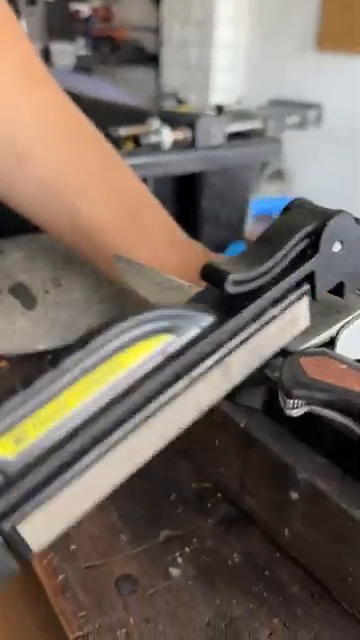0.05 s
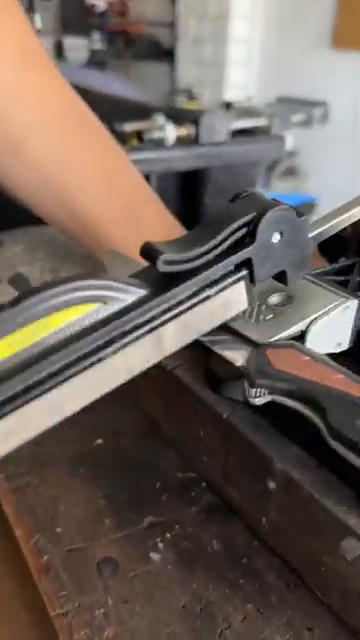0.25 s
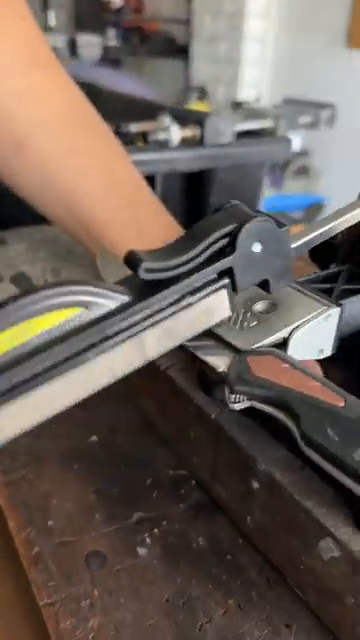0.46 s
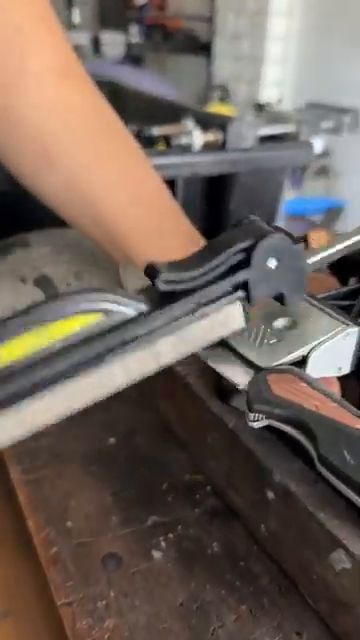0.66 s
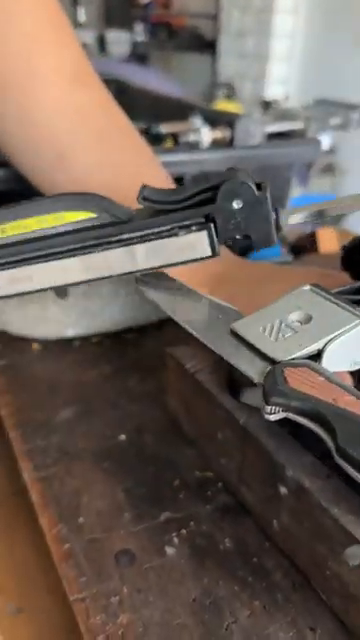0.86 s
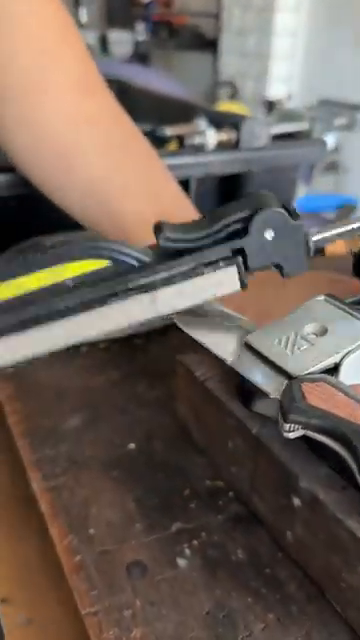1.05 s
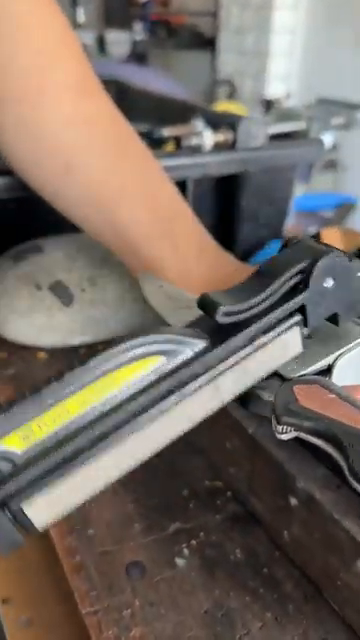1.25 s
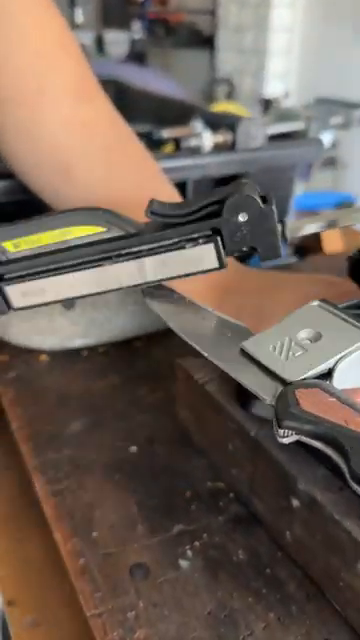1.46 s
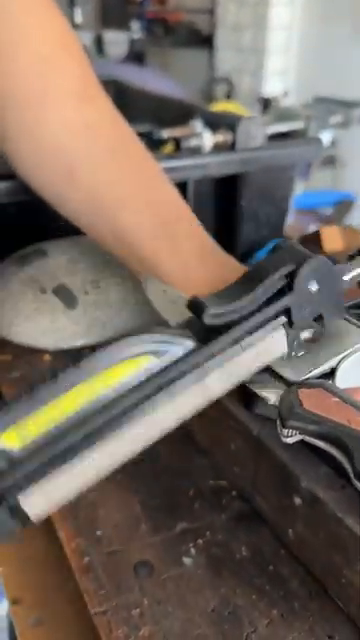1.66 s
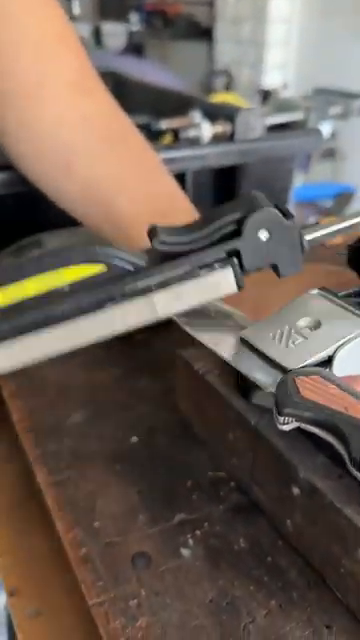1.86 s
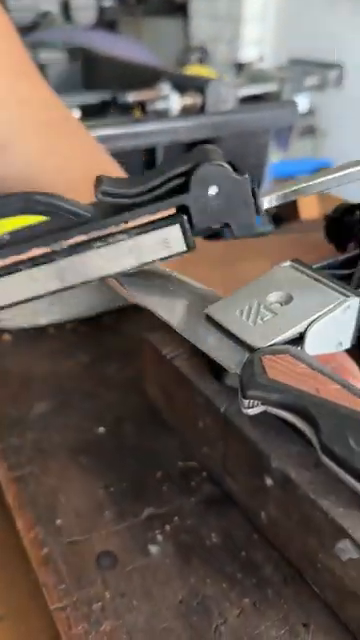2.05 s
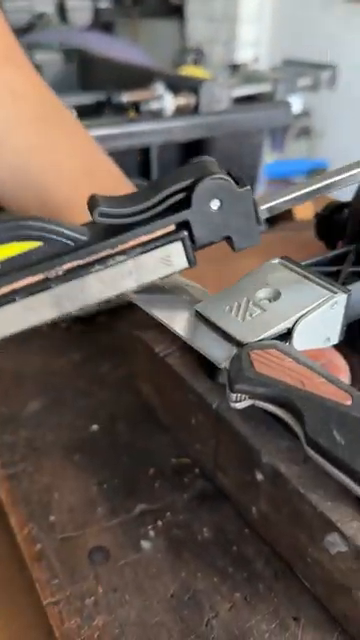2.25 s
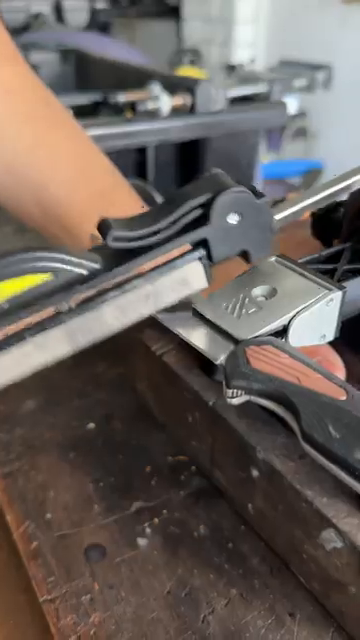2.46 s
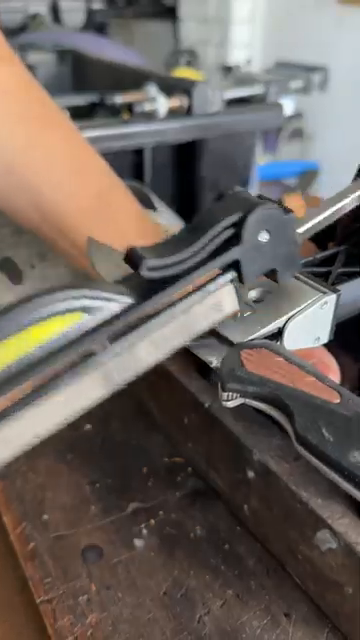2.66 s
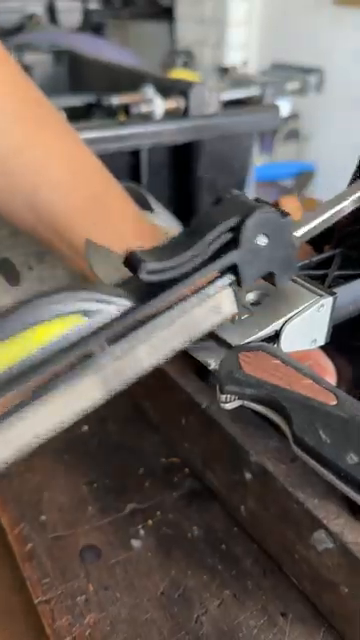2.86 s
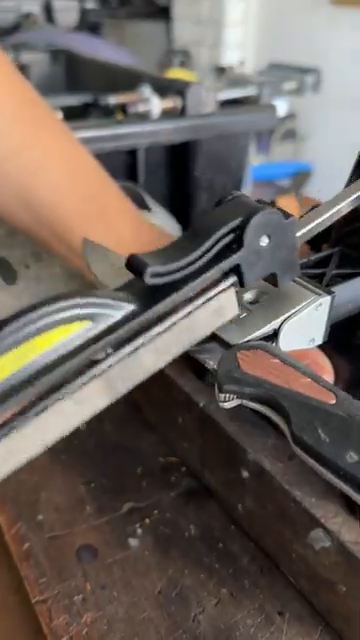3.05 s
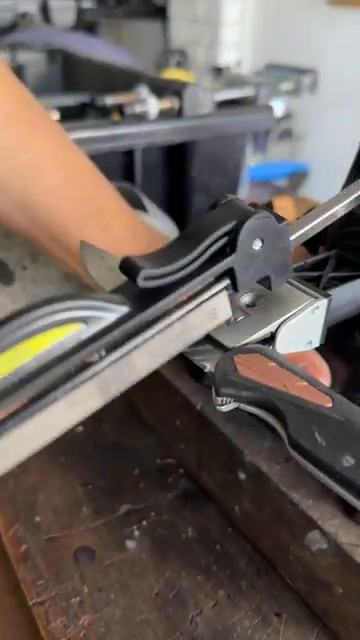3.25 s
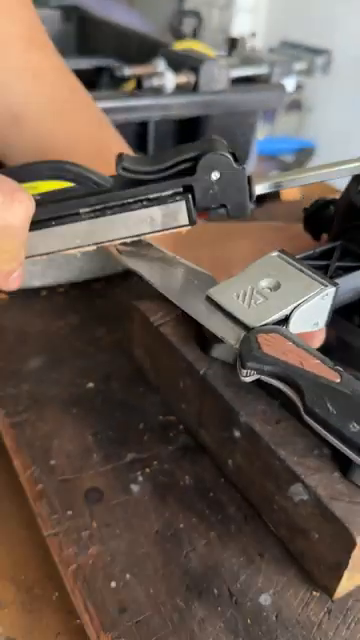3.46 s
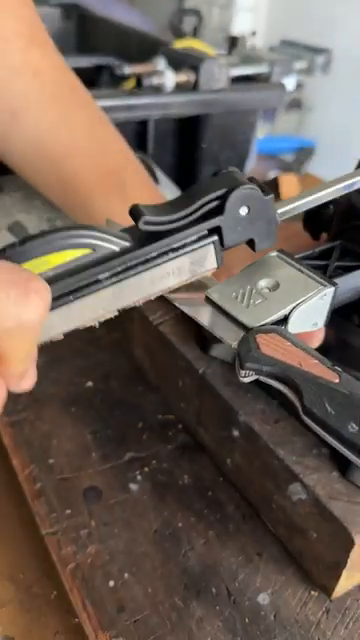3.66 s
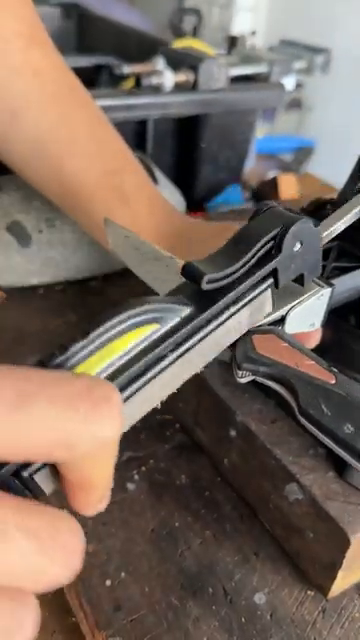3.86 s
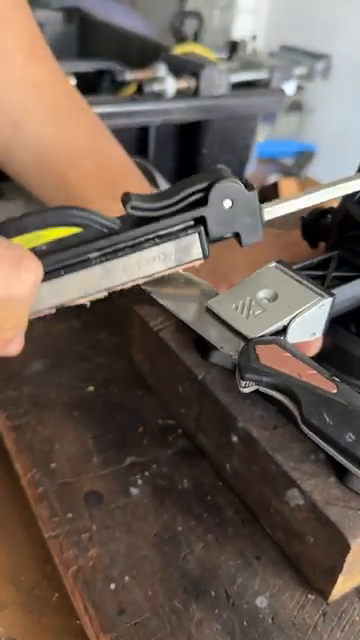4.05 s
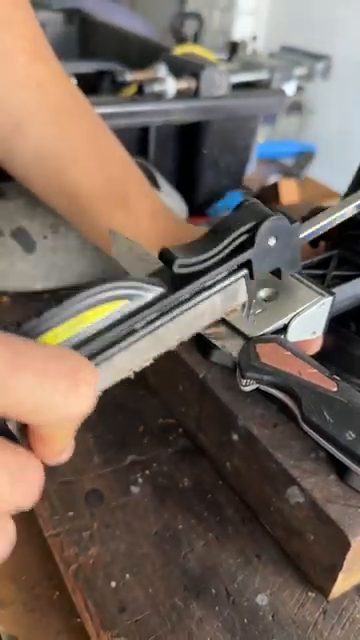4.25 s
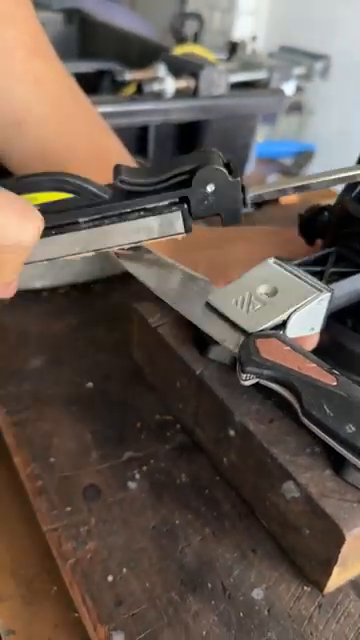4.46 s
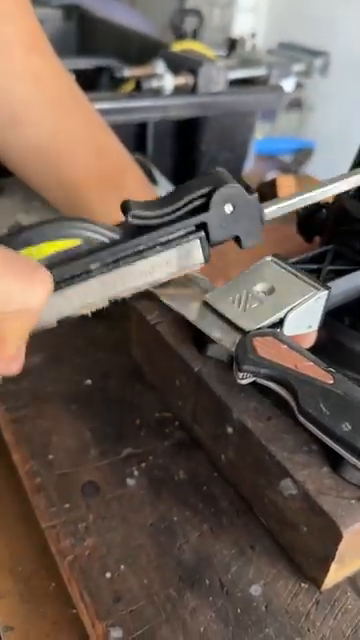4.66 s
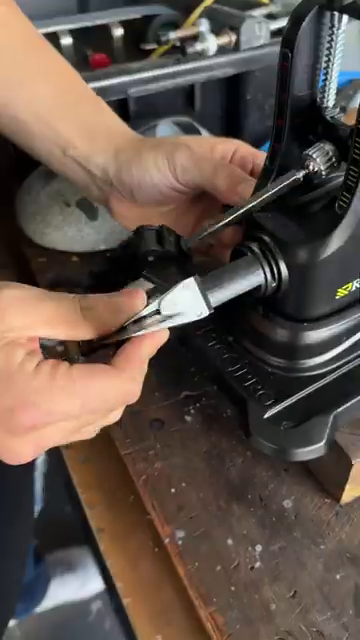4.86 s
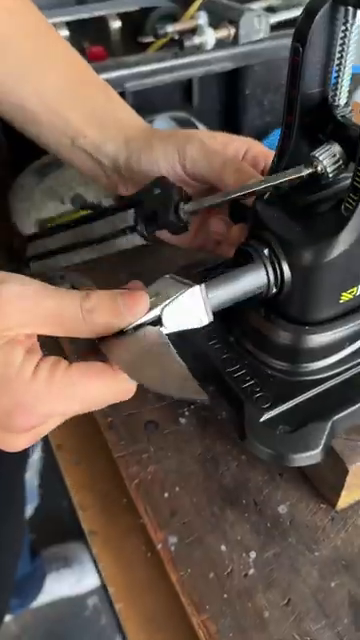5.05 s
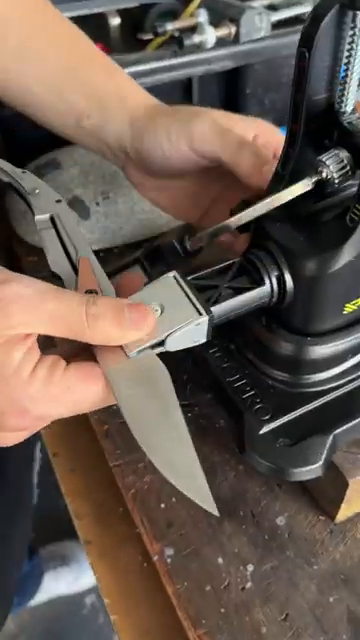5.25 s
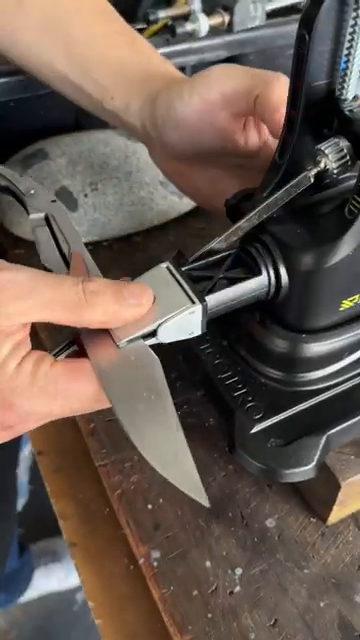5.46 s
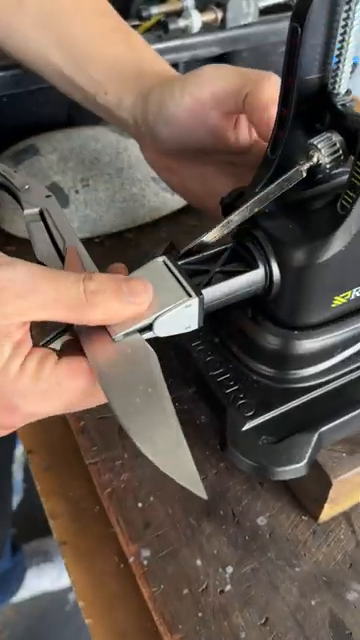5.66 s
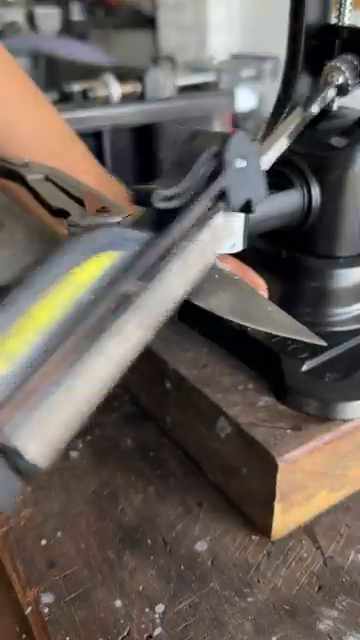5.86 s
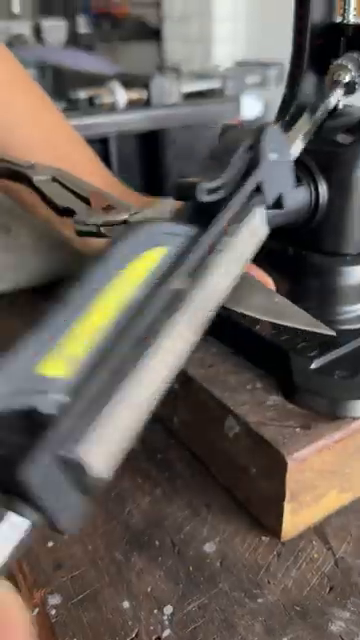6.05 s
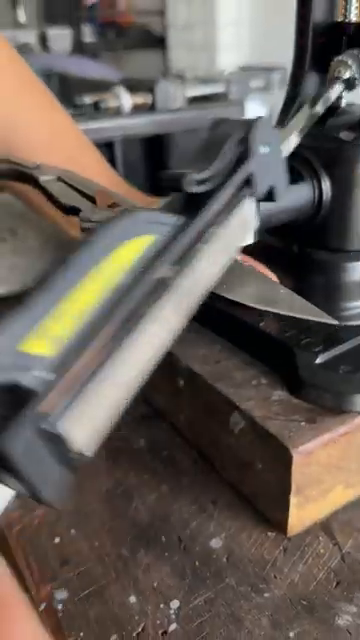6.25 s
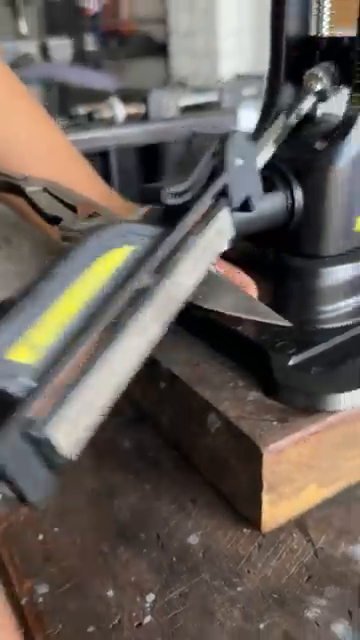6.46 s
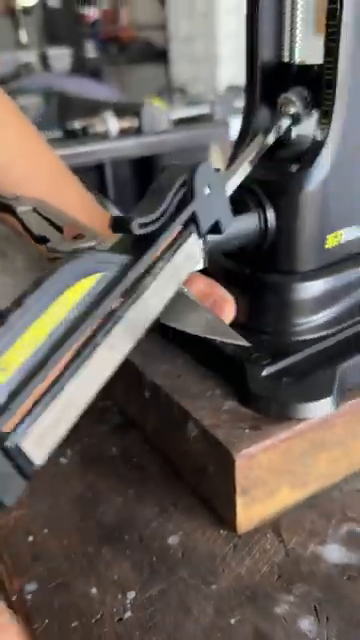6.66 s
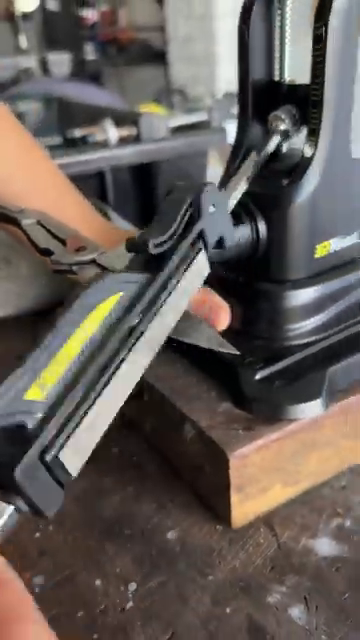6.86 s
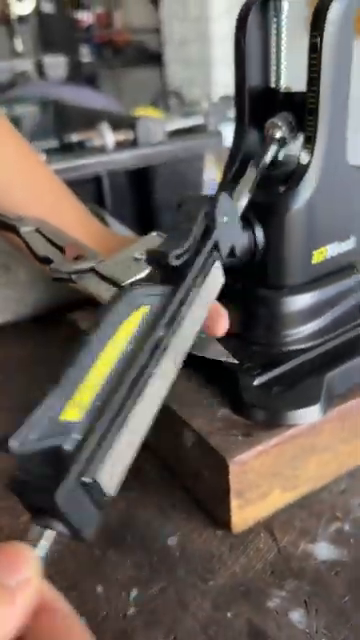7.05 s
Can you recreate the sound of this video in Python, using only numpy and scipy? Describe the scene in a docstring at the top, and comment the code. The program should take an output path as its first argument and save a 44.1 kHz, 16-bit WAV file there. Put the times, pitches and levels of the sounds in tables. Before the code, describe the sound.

Gritty steel honing strokes with dull rod knocks, a brief low hum, loud metal clamp clacks with a ringing blade, then more quick scraping.

```python
"""Workshop bench: a stone on a guide rod scrapes to and fro over a clamped knife, four to nine strokes a second.
Honing is grains of noise through steel resonances, gated by stroke speed; rod knocks are struck modes plus cracks.
Honing pauses while a motor hums (sines); the clamp is turned over with rubbing, groans and loud clacks (modes
and noise) and the blade rings (decaying modes); then the other face is honed.
Room hiss and rumble run beneath; the level dips sharply for about 20 ms six times."""
import sys
import numpy as np
from scipy import signal
from scipy.fft import rfft, irfft, next_fast_len
from scipy.io import wavfile
from scipy.ndimage import uniform_filter1d

SR = 44100
rng = np.random.default_rng(int(sys.argv[2]) if len(sys.argv) > 2 else 0)


def materialize(psi):
    """Save the field psi as 16-bit PCM at rate SR to the path in sys.argv[1].

    A 1-D psi becomes a single channel; in a 2-D psi each row is a channel.
    """
    bounded = np.clip(np.atleast_2d(psi).T, -1, 1)
    quanta = np.round(bounded * 32767).astype(np.int16)
    wavfile.write(sys.argv[1], SR, quanta)


N = 313551
TIME = np.arange(N) / SR
HZ = np.maximum(np.arange(N // 2 + 1) * SR / N, 1)


def from_db(db):
    """Decibels to gain."""
    return 10 ** (np.asarray(db) / 20)


def in_time(rows):
    """Interpolate each column of a curve at every sample."""
    s, *columns = np.transpose(rows)
    return [np.interp(TIME, s, column) for column in columns]


def colour(points):
    """Gain at every frequency from a short spectrum, interpolated over log frequency."""
    hz, db = np.transpose(points)
    return from_db(np.interp(np.log(HZ), np.log(hz), db))


def filtered(x, gain):
    """Apply a gain, real or complex, at every frequency."""
    size = next_fast_len(N + 4096)
    grid_hz = np.arange(size // 2 + 1) * SR / size
    spectrum = rfft(x, size) * np.interp(grid_hz, HZ, gain)
    return irfft(spectrum, size)[..., :N]


def rms_one(x):
    """Scale to rms 1."""
    return x / np.sqrt(np.mean(x ** 2) + 1e-20)


def peak_one(x):
    """Scale so that the loudest 4 ms have rms 1."""
    return x / np.sqrt(uniform_filter1d(x ** 2, SR // 250).max() + 1e-20)


def drift(axis_values, step):
    """Random curve along time or frequency: unit-spread Gaussian knots joined by lines."""
    knots = rng.standard_normal(4096)
    return np.interp(axis_values / step, np.arange(len(knots)), knots)


def ring(push, modes):
    """Decaying modes driven by a force; neighbouring modes swing in opposite senses."""
    out = 0
    for hz, db, t60_s in modes:
        radius = from_db(-60 / (t60_s * SR))
        angle = 2 * np.pi * hz / SR
        poles = [1, -2 * radius * np.cos(angle), radius * radius]
        mode = signal.lfilter([0, np.sin(angle)], poles, push + 1e-18)
        out = -out + from_db(db) * mode
    return out


def add(track, s, sound):
    """Mix a short sound in at a time, trimmed to the track."""
    at = round(s * SR)
    sound = sound[max(-at, 0):N - at]
    track[max(at, 0):max(at, 0) + len(sound)] += sound


def grains(per_s, spread_db):
    """Random tiny fractures of uneven size and either sign."""
    sizes = from_db(spread_db * np.minimum(rng.exponential(1, N), 4))
    signed = sizes * rng.choice([-1, 1], N)
    return rms_one(signed * (rng.random(N) < per_s / SR))


def crack(force, bright_db, body):
    """Hard contact noise: coloured by the body, tilted about 4 kHz by hardness; loudest 4 ms at rms 1."""
    hz = np.maximum(np.abs(np.fft.fftfreq(len(force))) * SR, 1)
    tilt = from_db(bright_db * np.clip(np.log2(hz / 4000) / 2, -.5, .8))
    log_gain = np.log(np.interp(hz, HZ, body) * tilt)
    causal = np.exp(np.conj(signal.hilbert(log_gain)))   # minimum phase: rings only after contact
    return peak_one(irfft(rfft(force) * causal[:len(force) // 2 + 1], len(force)))


def sliding(per_s, response, spread_db, shift_db, count=5):
    """Grains under a moving contact: random crossfades between differently rippled narrow modes."""
    total, power = 0, 0
    for layer in range(count):
        share = from_db(10 * drift(TIME, .045))
        modes = response * from_db(shift_db * drift(HZ, 70.02))
        total = total + share * rms_one(filtered(grains(per_s, spread_db), modes))
        power = power + share ** 2
    return total / np.sqrt(power)


# Stone, holder and blade resonances. Each row: centre in Hz, width in Hz, lift in dB.
STEEL_RESONANCES = [(578, 130, 7), (830, 150, 3.5), (1000, 140, 3.5), (1654, 120, 3.5), (2676, 160, 6),
                    (3806, 310, 7.5), (5600, 160, 2.5), (6630, 230, 3.5), (7060, 140, 2), (8070, 390, 4.5),
                    (9780, 640, 7), (13000, 230, -6), (15200, 450, 2)]


def steel(ripple_db):
    """Response of the assembly: broad resonances over a thicket of narrow ones."""
    lift_db = sum(db / (1 + (2 * (HZ - hz) / width) ** 2) for hz, width, db in STEEL_RESONANCES)
    return from_db(lift_db + ripple_db * drift(HZ, 45))


# Stereo width. Each row: frequency in Hz, side over mid in dB before scaling.
STEREO_WIDTH = [(60, -34), (150, -22), (300, -11.5), (700, -7.5), (1300, -7), (2400, -4.5), (4400, -3),
                (8000, -2.5), (11000, 4.5), (15000, -5.5)]


def two_ports(x, scatter=3.3, side_db=0.5, imbalance=0.35):
    """Near reflections give two microphones different phase and level at each pitch, more so in the treble."""
    lead = np.tanh(scatter * drift(HZ, 219.8) - (HZ / 7500) ** 2)
    louder = imbalance * (drift(HZ, 296) + 0.36 * np.clip(HZ / 15000, 0, 1))
    side = from_db(side_db) * filtered(x, colour(STEREO_WIDTH) * (louder + 1j * lead))
    return np.array([x + side, x - side])


# Stone strokes. Each row: start in seconds, length in seconds, grit level in relative dB,
# holder level in relative dB, growth from start to end in dB.
STONE_STROKES = [(-0.08, 0.23, -55, -55, -4), (0.167, .127, -54.5, -55, 1), (0.296, 0.1, -52, -52.5, 1),
                 (0.427, 0.12, -51, -52, 2.5), (0.548, 0.14, -52.5, -54.5, -4), (0.669, 0.1, -39, -47.5, 2),
                 (0.73, .248, -53.5, -51.5, 1), (0.987, 0.27, -52.5, -54, 2), (1.267, 0.24, -49.5, -51, 2),
                 (1.532, 0.25, -52.5, -52, 1.5), (1.784, .26, -50.5, -52, 1.5),
                 (1.993, .122, -41, -46.5, 2), (2.1, .122, -47, -48, -7), (2.221, .11, -42.5, -49.5, 4),
                 (2.333, 0.12, -48.5, -50, -11), (2.45, .1, -44.5, -51.5, 6), (2.547, 0.11, -47.5, -52, -2),
                 (2.651, 0.12, -49.5, -54.5, -4), (2.763, 0.1, -48.5, -50.5, -3),
                 (2.865, 0.12, -48.5, -54, 0), (2.974, 0.12, -49.5, -51, -11),
                 (3.084, 0.12, -47.5, -54.5, 0), (3.192, .103, -46, -49, 2), (3.301, .108, -44.5, -48, -1),
                 (3.402, 0.079, -43.5, -48.5, -7), (5.868, .072, -42, -52.5, 5),
                 (5.938, 0.12, -45, -53, -6), (6.045, 0.11, -45, -59, -3), (6.139, 0.15, -48, -51.5, -7),
                 (6.27, 0.087, -42, -47.5, -1), (6.36, 0.11, -47.5, -48.5, -7),
                 (6.476, 0.099, -44, -50.5, -3), (6.58, 0.12, -49.5, -50, -3.5),
                 (6.693, 0.12, -49.5, -50.5, -7.5), (6.813, 0.1, -50, -49.5, 1), (6.92, 0.11, -51, -51, -6),
                 (7.037, 0.13, -52.5, -51, 0)]
TURN_S = 0.039   # time constant of speeding up and of stopping
GRIT_POWER, HOLDER_POWER = 1.25, 0.86   # exponents of speed
GRIT_REST, HOLDER_REST = 0.12, 0.31   # gain left as the stone turns round


def strokes():
    """Each stroke speeds up, runs and slows to the turn; grit and holder gains follow its speed."""
    grit, holder = np.zeros((2, N))
    for start, length, grit_db, holder_db, growth_db in STONE_STROKES:
        t = TIME[:round(length * SR)]
        speed = np.tanh(t / TURN_S) * np.tanh((length - t) / TURN_S)
        growth = from_db(growth_db * (t / length - .5))
        add(grit, start, from_db(grit_db) * growth * np.hypot(speed ** GRIT_POWER, GRIT_REST))
        add(holder, start, from_db(holder_db) * growth * np.hypot(speed ** HOLDER_POWER, HOLDER_REST))
    return grit, holder


# Hand on the stone. Each row: time in seconds, extra treble in dB, extra bench shake in dB.
HAND_BITE = [(0, -5, -0.5), (.6, 0, 0), (.75, 5, -2), (1.1, 0, -5.5), (1.9, 3.5, -5.5), (2.1, 7, 1),
             (2.4, 2, 0), (3.4, 3, 1), (5.9, -1.5, 0), (6.5, 2.5, -1.5), (7.1, 3.5, -1.5)]
# Grit colour. Each row: frequency in Hz, density in dB per Hz.
GRIT_COLOUR = [(2500, -6), (4500, -12), (6000, -2.5), (7500, 3.5), (8800, -5), (10500, -8), (11800, -15.5),
               (13000, -4.5), (14200, -4), (15700, -4.5)]
# Holder colour. Each row: frequency in Hz, density in dB per Hz.
HOLDER_COLOUR = [(30, 5), (75, 10), (150, 0.5), (330, -11), (600, -0.5), (1200, -14), (2000, -14),
                 (3300, -14.5), (4300, -21.5), (6000, -42)]
PAUSE_FROM_S, PAUSE_TO_S = 3.46, 5.86   # no honing


def honing(body, flutter_db=2.5, hiss_db=0.5, holder_db=0.5, diffuse_db=-3):
    """Grit hiss and holder shake both follow stroke speed, each with its own exponent. Returns left and right."""
    grit_gain, holder_gain = strokes()
    keen_db, shake_db = in_time(HAND_BITE)
    # two independent noise draws; the second widens the stereo image
    grit_response = colour(GRIT_COLOUR) * body
    grit = np.array([sliding(11000, grit_response, spread_db=4.0, shift_db=5.0) for draw in range(2)])
    treble = filtered(grit, 1 / (1 + (9000 / HZ) ** 8))
    grit = grit + treble * (from_db(keen_db) - 1)
    holder_response = colour(HOLDER_COLOUR) * body
    holder = np.array([sliding(4000, holder_response, spread_db=4.0, shift_db=5.5) for draw in range(2)])
    bass = filtered(holder, 1 / (1 + (HZ / 280) ** 4))
    holder = holder + bass * (from_db(shake_db) - 1)
    working = (TIME < PAUSE_FROM_S) | (TIME > PAUSE_TO_S)
    uneven = working * from_db(flutter_db * drift(TIME, .008))
    hiss = from_db(hiss_db) * grit_gain * grit
    shake = from_db(holder_db) * holder_gain * holder
    main, widening = uneven * (hiss + shake)
    side = from_db(diffuse_db) * filtered(widening, colour(STEREO_WIDTH))
    return two_ports(main) + np.array([side, -side])


# Room hiss colour. Each row: frequency in Hz, density in dB per Hz.
AIR_COLOUR = [(150, 8.5), (350, 0.5), (500, -7.5), (700, -2.5), (1000, -8), (1300, -13.5), (2050, -1.5),
              (2800, -15.5), (3800, -16), (5000, -21.5), (9300, -13.5), (11500, -37), (13500, -22),
              (15500, -13.5)]
# Room level. Each row: time in seconds, level in dB before the air and rumble trims.
AIR_LEVEL = [(0, -63.5), (3.45, -58), (4.2, -60.5), (4.7, -56.5), (7.1, -56.5)]
# Rumble colour. Each row: frequency in Hz, density in dB per Hz.
RUMBLE_COLOUR = [(20, -15), (45, -2), (75, 3), (110, -4.5), (160, -2.5), (220, -8.5), (320, -18),
                 (600, -16), (1200, -62)]
# Buzz partials. Each row: multiple of BUZZ_HZ, starting level in relative dB, growth in dB per second.
BUZZ_PARTIALS = [(1, -7, 0), (2, -1, 6), (3, 1, -4), (4, -9, 0), (5, -15, -3)]
MOTOR_HZ, BUZZ_HZ = 59.7, 63.1
HUM_FROM_S, HUM_TO_S = 3.46, 4.86
MOTOR_START_DB, MOTOR_FADE_DB_PER_S, BUZZ_DB = -43, 14.5, -61


def workshop(air_trim_db=-2, waver_db=0.6, rumble_db=-5):
    """A motor's hum fades while a second machine's buzz lingers, over the room's hiss and rumble."""
    air_db, = in_time(AIR_LEVEL)
    running = (TIME > HUM_FROM_S) & (TIME < HUM_TO_S)
    since_s = np.clip(TIME, HUM_FROM_S, HUM_TO_S) - HUM_FROM_S
    turns_s = TIME + .0002 * drift(TIME, .15)   # slightly uneven running
    motor_db = MOTOR_START_DB - MOTOR_FADE_DB_PER_S * since_s
    motor = np.sqrt(2) * np.sin(2 * np.pi * MOTOR_HZ * turns_s)
    buzz = 0
    for multiple, db, growth in BUZZ_PARTIALS:
        cycles = round(multiple) * BUZZ_HZ * turns_s + rng.random()
        buzz = buzz + np.sqrt(2) * from_db(db + growth * since_s) * np.sin(2 * np.pi * cycles)
    waver = from_db(waver_db * drift(TIME, 0.037))
    hum = running * (from_db(motor_db) * motor + from_db(BUZZ_DB) * buzz) * waver
    air = rms_one(filtered(rng.standard_normal(N), colour(AIR_COLOUR)))
    rumble = rms_one(filtered(rng.standard_normal(N), colour(RUMBLE_COLOUR)))
    return hum + from_db(air_db) * (from_db(air_trim_db) * air + from_db(rumble_db) * rumble)


# Rod knocks. Each row: time in seconds, thud in relative dB, crack in relative dB, brightness tilt in dB.
ROD_KNOCKS = [(0.371, -32.5, -40.5, -0.5), (0.423, -36, -54, -4), (0.64, -38, -46, 0), (0.86, -46, -48, 18),
              (0.998, -45, -57, -7), (1.752, -42.5, -74, 0), (2.106, -60, -34, 15),
              (2.139, -53, -40.5, -10), (2.298, -31.5, -32.5, -11), (2.517, -31, -32, -10),
              (2.642, -30.5, -44.5, -8), (2.7338, -31, -28.5, -3), (2.85, -30, -43, -9),
              (2.933, -34.5, -29.5, -4.5), (3.022, -44, -45, -5), (3.16, -37.5, -35, -4),
              (3.331, -39.5, -43.5, -9), (3.377, -35, -28, 0.5), (3.898, -25, -46.5, -16),
              (4.391, -27.5, -46, -16), (5.945, -48, -42.5, -4), (6.009, -49, -37.5, 8),
              (6.031, -44, -36, -2), (6.148, -51, -43, -10), (6.185, -42, -44.5, -6),
              (6.241, -42.5, -31, 4.5), (6.46, -42, -34, 0.5), (6.896, -44, -55, 10)]
# Rod and holder modes. Each row: frequency in Hz, level in dB before random variation, t60 in seconds.
ROD_MODES = [(572.6, 3, 0.036), (675, 0.5, 0.029), (828, -7, 0.019), (980, -14, 0.029), (1530, -9, 0.03)]
# Bench modes. Each row: frequency in Hz, level in relative dB, t60 in seconds.
BENCH_MODES = [(83.3, -0.5, 0.094), (145, -1.5, 0.05), (209, 2, 0.061)]
# Hard contact colour. Each row: frequency in Hz, density in dB per Hz.
CRACK_COLOUR = [(400, -3.5), (1000, -0.5), (1600, 1.5), (2100, -2), (3000, -2), (4000, -2.5), (4800, -4.5),
                (6000, 1), (9500, -11), (11500, -17), (15000, -9)]
# Hollow knock body. Each row: frequency in Hz, density in dB per Hz.
HOLLOW_COLOUR = [(200, -7), (420, -2), (650, 3), (1000, -10), (1600, -10), (2800, -24), (5000, -40)]


def knocks(body, rattle_s=0.0015, thud_db=-1, crack_db=1.2, bench_db=-7, travel=0.16, vary_db=2.5,
           run_up_s=0.012, run_up_db=-12, hollow_db=-7):
    """Bending waves carry each knock along the rod: treble arrives first, bass last."""
    out, t = np.zeros(N), TIME[:8192]
    tap = 1. * (t == 0)
    bench = peak_one(ring(tap, BENCH_MODES))
    contact_body = body * colour(CRACK_COLOUR)
    grinding_body = body * colour(GRIT_COLOUR)
    for s, low_db, high_db, bright_db in ROD_KNOCKS:
        # the rod chatters against its guide
        rattle = rng.standard_normal(len(t)) * (t / rattle_s + 0.47) * np.exp(-t / rattle_s)
        add(out, s, from_db(high_db + crack_db) * crack(rattle, bright_db, contact_body))
        add(out, s, from_db(low_db + hollow_db) * crack(rattle, 0, colour(HOLLOW_COLOUR)))
        add(out, s, from_db(high_db + bench_db) * bench)
        # the stone grinds harder just before the stop
        run_up = rng.standard_normal(len(t)) * np.exp((t - t[-1]) / run_up_s)
        grind = crack(np.pad(run_up, (0, len(t))), bright_db, grinding_body)
        grinding = not PAUSE_FROM_S < s < PAUSE_TO_S
        add(out, s - t[-1], grinding * from_db(high_db + run_up_db) * grind)
        # mode levels vary at random from knock to knock
        struck = [(hz, db + vary_db * rng.standard_normal(), t60_s) for hz, db, t60_s in ROD_MODES]
        thud = peak_one(ring(tap - np.roll(tap, 36), struck))   # a push and its rebound
        add(out, s - .005, from_db(low_db + thud_db) * thud)
    delay_s = travel * np.maximum(1 / np.sqrt(HZ + 20) - 1 / np.sqrt(6000), 0)
    return filtered(out, np.exp(-2j * np.pi * np.cumsum(delay_s) * SR / N))


# Coarse grains catching the edge. Each row: time in seconds, half length in seconds, level in dB.
EDGE_SCRATCHES = [(0.87, 0.0097, -49), (1.028, 0.02, -49), (2.029, 0.0083, -51), (2.075, 0.008, -40),
                  (4.16, 0.0018, -60), (4.246, .002, -63), (4.495, .012, -59), (5.976, 0.0055, -43),
                  (6.182, .007, -47)]
# Scratch colour. Each row: frequency in Hz, density in dB per Hz.
RASP_COLOUR = [(400, -5), (1050, 8.5), (1800, -0.5), (3500, -7.5), (7000, -11), (11000, -27)]


def scratches(body, per_s=1500):
    """A coarse grain stutters along the edge for a moment, each time with a ring of its own."""
    out, t = np.zeros(N), TIME[:8192] - TIME[4096]
    for s, half_s, db in EDGE_SCRATCHES:
        catches = rng.random(len(t)) < per_s / SR
        slips = rng.standard_normal(len(t)) * catches * np.exp(-(t / half_s) ** 2)
        response = body * colour(RASP_COLOUR) * from_db(4.5 * drift(HZ, 119.5))
        add(out, s + t[0], from_db(db) * crack(slips, 0, response))
    return out


# Stand bumps. Each row: time in seconds, level in dB.
STAND_BUMPS = [(5.208, -27), (5.226, -21.5), (5.305, -21.5), (5.807, -28), (4.492, -45)]
# Socket groans. Each row: time in seconds, half length in seconds, pitch in Hz, level in dB.
SOCKET_GROANS = [(5.016, 0.027, 830, -30), (5.519, 0.036, 720, -30)]


def stand(groan_t60_s=0.052):
    """The stand bumps on the bench; its dry socket groans as random slips drive one mode."""
    out = np.zeros(N)
    bump = peak_one(ring(1. * (TIME[:8192] == 0), BENCH_MODES))
    for s, db in STAND_BUMPS:
        add(out, s, from_db(db) * bump)
    for s, half_s, hz, db in SOCKET_GROANS:
        slips = grains(2500, spread_db=3.0) * np.exp(-((TIME - s) / half_s) ** 2)
        out += from_db(db) * peak_one(ring(slips, [(hz, 0, groan_t60_s)]))
    return out


# Clamp shoves. Each row: time in seconds, rise in seconds, decay in seconds,
# rumble, rub and hiss levels in relative dB.
CLAMP_SHOVES = [(4.9, 0.06, 0.14, -29, -32, -37.5), (5.081, .025, 0.055, -33, -28, -26.5),
                (5.229, 0.034, 0.075, -22.5, -39.5, -58), (5.467, .016, .009, -29.5, -54, -31),
                (5.512, 0.018, 0.05, -26.5, -36.5, -51), (5.615, 0.018, 0.048, -34.5, -30, -27),
                (5.829, 0.067, 0.023, -32, -30.5, -30)]
GRIP_RELATIVE_DB = (-36, -43, -47)   # between shoves: rumble, rub, hiss


def shoves():
    """Each shove swells and dies away over the steady grip; gains of rumble, rub and hiss."""
    power = from_db(GRIP_RELATIVE_DB)[:, None] ** 2
    for s, rise, decay, *levels_db in CLAMP_SHOVES:
        age = np.abs(TIME - s) / np.where(TIME < s, rise, decay)
        swell = np.exp(-np.minimum(age, 20))
        power = power + (from_db(levels_db)[:, None] * swell) ** 2
    return np.sqrt(power)


# Rub colour. Each row: frequency in Hz, density in dB per Hz.
RUB_COLOUR = [(250, -16), (450, -10.5), (600, -3), (780, 7), (1000, -3), (1350, -9), (2100, 1.5),
              (2700, -12), (4000, -46)]
# Handling hiss colour. Each row: frequency in Hz, density in dB per Hz.
HISS_COLOUR = [(1800, 6.5), (2900, 2), (3800, 3), (4800, -0.5), (6800, 2), (9500, -3), (11500, -33),
               (13500, -7), (15500, -9)]


def handling(body, rumble_db=0.0, rub_db=-1, hiss_db=-1):
    """Hands thump on the stand, the clamp rubs round in its socket, the blade rings on."""
    rumble, rub, hiss = shoves()
    hiss_response = colour(HISS_COLOUR) * np.sqrt(body) * from_db(4.0 * drift(HZ, 30))
    out = rumble * from_db(rumble_db) * rms_one(filtered(grains(900, spread_db=1.5), colour(RUMBLE_COLOUR)))
    out += rub * from_db(rub_db) * rms_one(filtered(grains(4000, spread_db=4.0), colour(RUB_COLOUR)))
    out += hiss * from_db(hiss_db) * rms_one(filtered(grains(15000, spread_db=4.0), hiss_response))
    out += blade()
    return out * np.interp(TIME, [4.85, 4.865, 5.838, 5.848], [0, 1, 1, 0])


# Clamp clacks. Each row: time in seconds, thud in relative dB, crack in relative dB,
# brightness tilt in dB, rise in seconds, decay in seconds.
CLAMP_CLACKS = [(4.899, -20.5, -31, 1, 0.0047, 0.0061), (4.92, -12, -25, -6.5, 0.0033, 0.0064),
                (5.081, -9.5, -19, -1, 0.0095, 0.01), (5.094, -25, -19.5, -20, 0.0028, 0.0072),
                (5.108, -17.5, -15, -23, 0.0037, 0.0044), (5.124, -14, -16.5, 4.5, 0.0035, 0.0061),
                (5.29, -20, -19.5, -29, 0.0011, 0.0077), (5.353, -52, -20, -4.5, 0.0022, 0.0076),
                (5.363, -44, -24.5, -21, 0.004, 0.0088), (5.592, -29, -12.5, 14.5, 0.0038, 0.0061),
                (5.604, -19, -11, 5, 0.0034, 0.003)]
# Clamp modes. Each row: frequency in Hz, level in relative dB, t60 in seconds.
CLAMP_MODES = [(490, -17, 0.05), (675, -26, 0.042), (800, 7, 0.05), (911, 4, 0.042), (1143, -6.5, 0.069)]


def clacks(body, thud_db=-0.5, crack_db=0.8, judder=0.061, tail_db=-22, tail_s=0.026, peak_db=2, peak_s=0.00072):
    """Each clack swells for a few milliseconds, peaks sharply and dies away in noise, over a modal thud."""
    out, t = np.zeros(N), TIME[:8192] - TIME[2048]
    for s, low_db, high_db, bright_db, rise, decay in CLAMP_CLACKS:
        swell = np.exp(-np.abs(t) / np.where(t < 0, rise, decay))
        peak = from_db(peak_db) * np.exp(-np.abs(t) / peak_s)
        tail = from_db(tail_db) * np.exp(-np.abs(t) / tail_s)
        noise = (swell + (peak + tail) * (t >= 0)) * rng.standard_normal(len(t))
        push = (t == 0) + judder * swell * rng.standard_normal(len(t))
        thud = peak_one(ring(push - np.roll(push, SR // 1600), CLAMP_MODES))   # a push and its rebound
        early_thud = np.roll(thud, -SR // 260)
        snap = crack(noise, bright_db, body * colour(CRACK_COLOUR))
        add(out, s + t[0], from_db(low_db + thud_db) * early_thud + from_db(high_db + crack_db) * snap)
    return out


# Blade modes. Each row: frequency in Hz, level in dB before the ring trim, t60 in seconds.
BLADE_MODES = [(850, -24.5, 0.068), (1277, -23.5, 0.52), (1583, -27, 0.51), (1890, -53, 0.25),
               (2490, -23, 0.18), (2915, -49, .4), (2700, -34.5, 0.83), (2880, -34.5, 0.99),
               (3603, -33, 0.72), (6900, -38, 0.22), (3630, -40, 0.31), (7800, -39, 0.4), (8425, -40, 0.3)]
SNAP_S = 5.606   # the clamp snaps home


def blade(buzz_db=2.5, buzz_s=.004, ring_db=-3):
    """The blade rings after the snap and buzzes against the jaws, each mode in its own way."""
    snap = 1. * (np.arange(N) == round(SNAP_S * SR))
    out = 0
    for mode in BLADE_MODES:
        buzz = buzz_db * drift(np.abs(TIME - SNAP_S), buzz_s)
        out = out + ring(snap, [mode]) * from_db(ring_db + buzz)
    return out


def room(x, wet_db=-19, t60_s=0.22):
    """A faint, dull tail from the cluttered workshop: decaying low-passed noise as impulse response."""
    t = TIME[:SR // 2]
    noise = signal.lfilter([1], [1, -.6], rng.standard_normal((2, len(t))))
    tail = noise * from_db(-60 * t / t60_s) * (t > .004)
    tail /= np.sqrt(np.sum(tail ** 2, axis=1, keepdims=True))
    wet = signal.fftconvolve(x, tail, axes=1)[:, :N]
    return from_db(wet_db) * filtered(wet, HZ / (HZ + 400))


# Stone contact place. Each row: time in seconds, left over right in dB.
STONE_PLACE = [(0, -0.5), (.65, -0.5), (.75, 1.5), (1.05, 1.5), (1.2, -1), (1.95, -0.5), (2.05, -4),
               (2.5, -0.5), (7.1, -1.5)]
# Brief level dips. Each row: start in seconds, end in seconds.
LEVEL_DIPS = [(.648, .668), (1.981, 2.002), (3.448, 3.469), (3.916, 3.935), (4.447, 4.470), (5.85, 5.868)]


def scene():
    """All the work at the bench with its room tail, over the workshop; the level dips briefly."""
    body = steel(ripple_db=2.0)
    pan = from_db(in_time(STONE_PLACE)[0] * np.array([[.5], [-.5]]))
    work = honing(body) * pan
    # each part has its own stereo pattern
    for part in (knocks(body) + scratches(body), handling(body) + stand(), clacks(body)):
        work = work + two_ports(part)
    out = work + room(work) + two_ports(workshop())
    apart_s = np.min([np.maximum(start - TIME, TIME - end) for start, end in LEVEL_DIPS], axis=0)
    dip = (1 - np.clip(apart_s / .009, 0, 1)) ** 2
    return out * from_db(-32 * dip)


CUTOFF_HZ = 15750


def record(dry):
    """Clip peaks at full scale, then cut the treble above CUTOFF_HZ steeply."""
    low_pass = signal.ellip(10, .2, 80, CUTOFF_HZ, fs=SR, output="sos")
    return signal.sosfilt(low_pass, np.clip(dry, -1, 1))


dry = scene()
out = record(dry)
materialize(out)
```